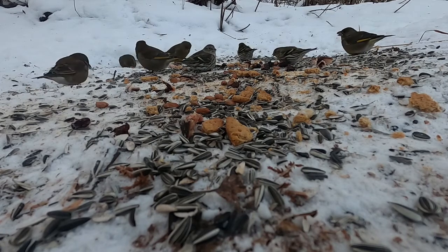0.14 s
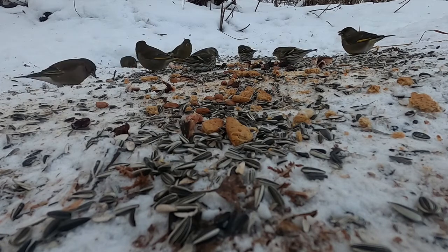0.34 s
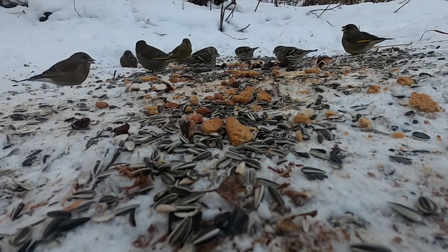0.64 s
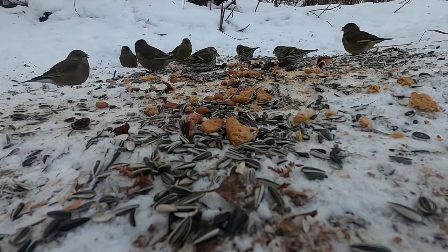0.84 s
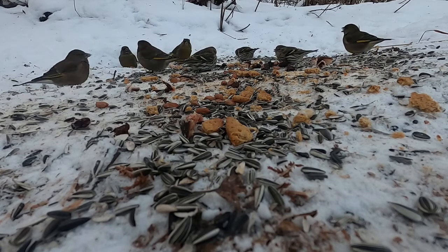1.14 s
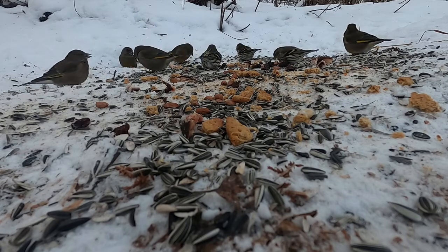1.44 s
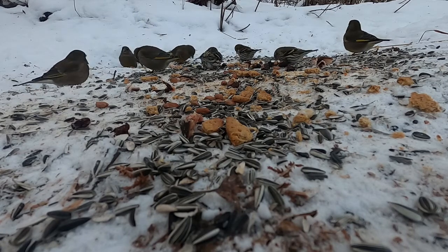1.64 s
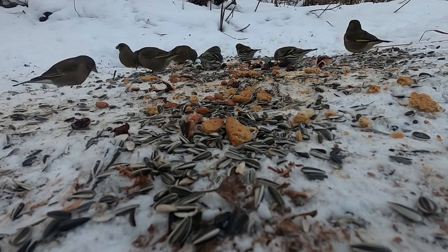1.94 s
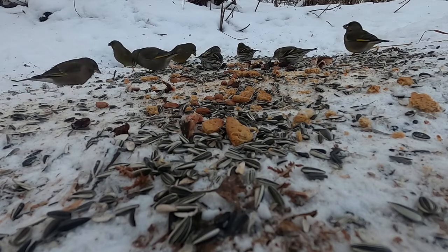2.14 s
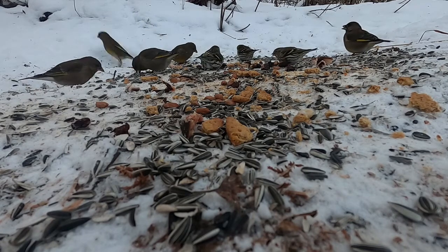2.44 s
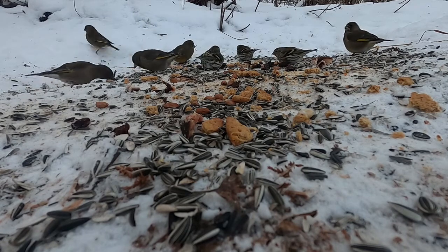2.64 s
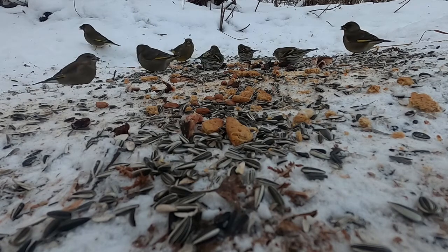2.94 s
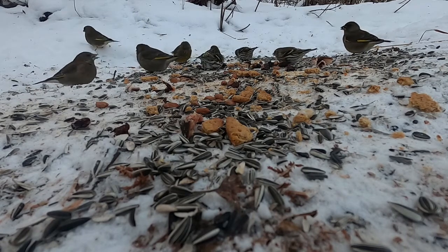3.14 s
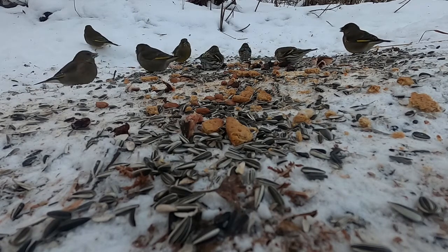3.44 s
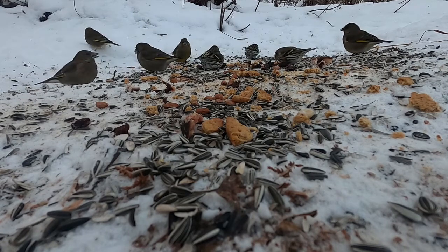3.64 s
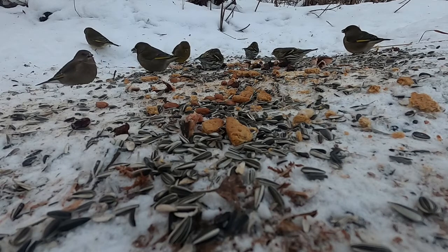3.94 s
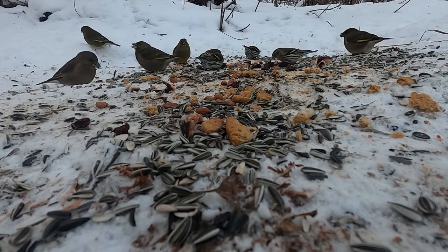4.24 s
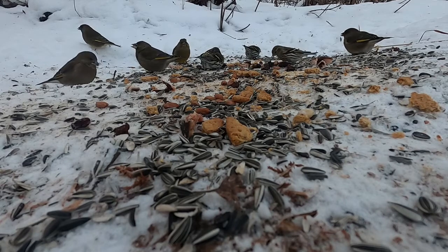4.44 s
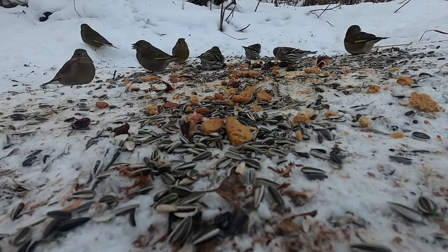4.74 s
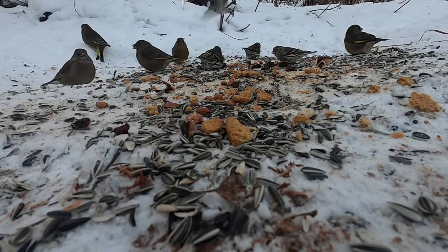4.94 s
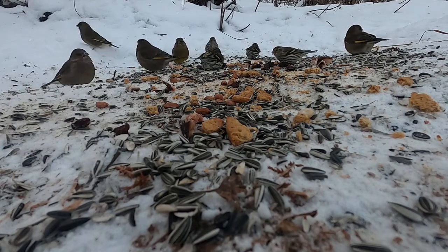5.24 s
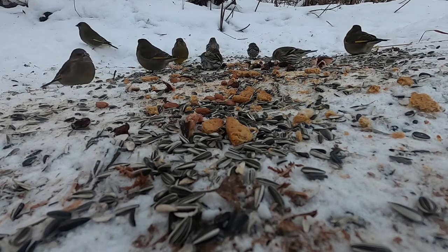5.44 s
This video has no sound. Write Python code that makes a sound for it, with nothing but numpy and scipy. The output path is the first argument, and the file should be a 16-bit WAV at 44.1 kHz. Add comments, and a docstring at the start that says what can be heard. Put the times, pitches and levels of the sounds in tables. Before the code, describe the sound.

Sharp dry seed-husk cracks tick irregularly close by over a low distant traffic rumble and wavering hum, with faint bird calls and a brief wing flutter.

```python
"""First a dry husk crack over low traffic rumble: small finches feed on snowy ground, a metre from two microphone ports.
Each crack is a knot of short pings with a bounce off the snow. Buzzy calls are trilled harmonics shaped by a throat;
thin whistles are gliding tones. One bird flutters up in low puffs of air and feather swish. Shaped noise makes the
far traffic, the far twitter and the rustle of husks and snow; wavering tones make a machine hum."""
import sys
import numpy as np
from scipy import signal
from scipy.fft import rfft, irfft, next_fast_len
from scipy.io import wavfile
from scipy.ndimage import map_coordinates

SR = 44100
rng = np.random.default_rng(int(sys.argv[2]) if len(sys.argv) > 2 else 0)


def store_pcm(level_fs):
    """Save levels as 16-bit WAV."""
    pcm = np.round(np.clip(level_fs, -1, 1) * 32767).astype(np.int16)
    wavfile.write(sys.argv[1], SR, np.atleast_2d(pcm).T)


N = 246959
SIDES = np.array([[1], [-1]])  # left port, right port; a positive left-right level leans left


def amp(db):
    """Decibels to gain."""
    return 10 ** (np.asarray(db) / 20)


def unit(x):
    """x at rms 1."""
    return x / np.sqrt(np.mean(x ** 2) + 1e-20)


def along(points, hz):
    """Each column after the frequency, read on a log frequency axis."""
    f, *cols = np.transpose(points)
    return [np.interp(np.log(hz + 1), np.log(f + 1), c) for c in cols]


def curves(rows):
    """One value per sample for each column after the time."""
    s, *cols = np.transpose(rows)
    return [np.interp(np.arange(N) / SR, s, c) for c in cols]


def wobble(rate):
    """A smooth random curve with `rate` knots a second."""
    knots = rng.standard_normal(int(N * rate / SR) + 4)
    return map_coordinates(knots, [np.arange(N) * rate / SR])


def add(track, s, sound, pan_db):
    """Lay a sound (one row, or one per port) into the stereo track at time s."""
    k = round(s * SR)
    track[:, k:k + np.shape(sound)[-1]] += sound * amp(SIDES * pan_db / 2)


def rush(spectrum, ports):
    """Stereo noise of mid rms 1; the right port hears a lagging copy plus noise of its own."""
    m = next_fast_len(N)
    hz = np.fft.rfftfreq(m, 1 / SR)
    shared, own = rfft(rng.standard_normal((2, m))) * amp(along(spectrum, hz)[0])
    alike, lead, pan_db = along(ports, hz)
    alike = np.clip(alike, 0, 1)
    right = alike * shared * np.exp(-1j * lead) + np.sqrt(1 - alike ** 2) * own
    pair = irfft([shared * amp(pan_db / 2), right * amp(-pan_db / 2)], m)[:, :N]
    return pair / np.std(pair.mean(axis=0))


# far traffic, low rumble: (frequency [Hz], relative level [dB per Hz])
RUMBLE_SPECTRUM = [(12, -35.5), (20, -0.5), (54, 2.5), (172, -7.5), (206, -5), (231, -5.5), (263, -4),
                   (354, -15), (409, -16.5), (600, -32.5), (780, -73.5), (1320, -120)]
# far traffic, tyre hiss: (frequency [Hz], relative level [dB per Hz])
TYRE_SPECTRUM = [(240, -41), (400, -3.5), (560, -9.5), (687, -10), (835, -12.5), (1370, -9), (2090, -28),
                 (2600, -35.5), (3380, -71), (5720, -120)]
# mean loudness of the tyres: (time [s], level [dB])
TYRE_LEVEL = [(0, -62.5), (1.4, -61.5), (2.6, -63), (2.9, -61.5), (3.15, -65), (3.5, -65), (4.2, -60.5),
              (4.7, -60.5), (5.0, -57.5), (5.6, -59.5)]
# far sound at the two ports: (frequency [Hz], likeness [0 to 1], left lead [rad], left-right level [dB])
FAR_PORTS = [(29.5, 0.82, 0.33, -4), (56.6, 0.91, 0.15, 0), (154, 1, 0.32, -0.5), (259, 0.99, 0.38, 1.5),
             (600, 0.75, 0.58, 2.5), (1300, 0.64, 2.12, 1.5), (2460, 0.29, 2.15, 6.5)]
RUMBLE_DB = -40.5  # mean level


def traffic():
    """Far traffic: low rumble and tyre hiss, both noise that drifts in level."""
    rumble = amp(RUMBLE_DB + 1.6 * wobble(3.8)) * rush(RUMBLE_SPECTRUM, FAR_PORTS)
    hiss = amp(curves(TYRE_LEVEL)[0] + 0.8 * wobble(6)) * rush(TYRE_SPECTRUM, FAR_PORTS)
    return rumble + hiss


# mean level of each hum tone: (time [s], then one level [dB] for each tone in HUM_TONES)
HUM_LEVELS = [(0, -55.5, -48.5, -68.5, -88), (1.4, -56, -44.5, -59, -96.5), (2.6, -48, -49, -59, -80),
              (3.8, -50.5, -50, -53, -77), (4.6, -54.5, -56.5, -59, -71.5), (5.6, -54, -52, -52.5, -71)]
# mean pitch of the hum tones: [Hz] each
HUM_TONES = [208.7, 265.6, 308.2, 686]


def machine_hum():
    """Machine tones that waver in pitch and level, a little stronger at the left port."""
    hum = 0
    for hz, db in zip(HUM_TONES, curves(HUM_LEVELS)):
        phase = 2 * np.pi * np.cumsum(hz + 2.1 * wobble(8)) / SR
        hum = hum + amp(db + 2.5 * wobble(4.5)) * np.sin(phase)
    return np.sqrt(2) * hum * amp(0.7 * SIDES)


# the far flock's voices run together: (frequency [Hz], relative level [dB per Hz])
TWITTER_SPECTRUM = [(1800, -9.5), (2500, -5), (3300, -3), (4500, -5), (5500, -12.5), (7000, -41)]
# mean loudness of the far twitter: (time [s], level [dB])
TWITTER_LEVEL = [(0, -82.5), (.4, -79), (.7, -79.5), (.86, -76), (1.15, -88.5), (1.43, -83.5), (2.3, -86),
                 (3.3, -79.5), (3.8, -74), (3.95, -80.5), (4.62, -76), (4.75, -82.5), (4.95, -79),
                 (5.25, -83.5), (5.6, -82)]
# flock sound at the two ports: (frequency [Hz], likeness [0 to 1], left lead [rad], left-right level [dB])
FLOCK_PORTS = [(2000, 0.25, 0.0066, 7), (3950, 0.2, 0.0053, 3.5), (7000, 0.86, 0.012, 1),
               (15000, 0.62, 0.0059, -7)]


def far_twitter():
    """Voices of the far flock, blurred into noise that swells and sinks."""
    return amp(curves(TWITTER_LEVEL)[0] + 2.2 * wobble(30)) * rush(TWITTER_SPECTRUM, FLOCK_PORTS)


# mean loudness of the husk rustle: (time [s], level [dB])
RUSTLE_LEVEL = [(0, -90), (.31, -80), (.6, -88.5), (.86, -76.5), (1.1, -85.5), (1.4, -79.5), (1.48, -70),
                (1.53, -82), (1.57, -74), (1.6, -80.5), (1.63, -83.5), (1.7, -82), (2.0, -85), (2.55, -85),
                (2.73, -74), (2.9, -80.5), (3.3, -81), (3.9, -82.5), (4.5, -84.5), (4.62, -77.5),
                (4.75, -81), (4.93, -74.5), (5.05, -78), (5.22, -80.5), (5.6, -85.5)]
# snow crunch relative to the husk rustle: (time [s], level difference [dB])
CRUNCH_OVER_RUSTLE = [(0, -17.5), (.9, -23), (1.4, -11.5), (2.3, -5.5), (2.6, -6), (3, -12.5), (4.3, -9),
                      (4.7, -11.5), (5.6, -10.5)]


def bustle():
    """Levels of husk rustle and of snow crunch, which follows it."""
    husk_db = curves(RUSTLE_LEVEL)[0]
    return husk_db, husk_db + curves(CRUNCH_OVER_RUSTLE)[0]


# stirred husks: (frequency [Hz], relative level [dB per Hz])
HUSK_SPECTRUM = [(3500, -12), (5000, -1), (6000, -2), (7600, 1.5), (8800, -7.5), (10000, -21), (12000, -61)]
# crunching snow: (frequency [Hz], relative level [dB per Hz])
CRUNCH_SPECTRUM = [(7000, -46), (9300, 1.5), (10600, -4.5), (12200, -2), (13500, -6), (15800, -9),
                   (16500, -46.5)]
GRAIN_DB = 3.3  # how sharply the rustle breaks up into grains


def rustle():
    """Feet and beaks stir husks and snow together: noise broken into fast grains of level."""
    husk_db, crunch_db = bustle()
    steps = wobble(24.97)
    husk_db = husk_db + 2.8 * steps + GRAIN_DB * unit(wobble(400))
    crunch_db = crunch_db + 3.2 * steps + 2.5 * wobble(19) + GRAIN_DB * unit(wobble(400))
    return amp(husk_db) * rush(HUSK_SPECTRUM, FLOCK_PORTS) + amp(crunch_db) * rush(CRUNCH_SPECTRUM, FLOCK_PORTS)


# effort as a bird flutters up: (time [s], level [dB])
FLUTTER_EFFORT = [(4.85, -8), (4.9, 1.5), (5.0, -2), (5.075, -7), (5.11, -9), (5.21, 3), (5.25, -17)]
# feather swish: (frequency [Hz], relative level [dB per Hz])
FEATHER_SPECTRUM = [(400, -15), (900, 5), (1500, 0), (2500, -9.5), (5000, -23), (8000, -31)]
DOWNSTROKE_S, BEATS_PER_S = 4.903, 29.2  # time of one downstroke, and the beat rate
PUSH_HZ, PUSH_DB, SWISH_DB = 56.3, -28.5, -59.5  # pushed air, feather swish; levels before effort


def wings():
    """Each downstroke pushes one low puff of air and swishes the feathers."""
    t = np.arange(N) / SR
    beat = (BEATS_PER_S * (t - DOWNSTROKE_S) + .5) % 1 - .5  # turns from the nearest downstroke
    aloft = (t > FLUTTER_EFFORT[0][0]) * (t < FLUTTER_EFFORT[-1][0])
    effort = amp(curves(FLUTTER_EFFORT)[0]) * aloft
    stroke = np.exp(3.9 * (np.cos(2 * np.pi * beat) - 1))
    push = stroke * np.sin(2 * np.pi * PUSH_HZ * beat / BEATS_PER_S + wobble(29))
    swish = (0.53 + 0.36 * stroke) * amp(2.8 * wobble(40)) * rush(FEATHER_SPECTRUM, FLOCK_PORTS)
    return effort * (amp(PUSH_DB) * push + amp(SWISH_DB) * swish)


def bend(start_hz, middle_hz, end_hz, u):
    """A pitch that passes through three values as u runs from 0 to 1."""
    line = start_hz + (end_hz - start_hz) * u
    return line + (2 * middle_hz - start_hz - end_hz) * 2 * u * (1 - u)


ECHO_DB, FARTHER = -18, .42  # echo of a -49 dB call; dB of echo gained per dB that a call is fainter


def place(track, s, call, db, pan_db):
    """A call and its scattered echoes; the fainter bird is farther, so its echoes weigh more."""
    t = np.arange(SR // 5) / SR
    tail = rng.standard_normal((2, len(t))) * amp(-60 * t / 0.17)
    echoes = signal.fftconvolve(call[None], tail / np.linalg.norm(tail[0]), axes=1)
    add(track, s, call, pan_db)
    add(track, s + 0.0028, amp(-6.5) * call, pan_db)  # the bounce off the snow
    add(track, s, amp(ECHO_DB + FARTHER * (-49 - db)) * echoes, pan_db / 2)


# whistled notes, each one bend of pitch:
# (time [s], length [s], start [Hz], middle [Hz], end [Hz], level before flutter and panning [dB])
WHISTLE_NOTES = [(0.048, 0.027, 2830, 3060, 2690, -76), (0.138, 0.022, 2850, 2780, 2950, -86),
                 (0.162, 0.035, 3790, 3400, 2730, -78), (0.348, 0.015, 4400, 4400, 4350, -81),
                 (.748, 0.01, 3850, 4070, 4230, -80), (0.797, 0.031, 3380, 3750, 4440, -81),
                 (0.847, .036, 4600, 5000, 3950, -79), (1.028, 0.046, 3960, 3850, 3750, -88),
                 (0.997, 0.031, 7950, 7800, 7500, -89), (1.19, 0.055, 4100, 4180, 4050, -80),
                 (1.334, 0.035, 7600, 7400, 6900, -84), (1.393, 0.011, 7200, 7100, 7400, -77),
                 (1.734, .013, 3870, 4500, 5000, -79), (1.742, .021, 5000, 4550, 3850, -71),
                 (1.762, .014, 4800, 4440, 3900, -77), (1.905, 0.014, 4200, 4630, 3600, -78),
                 (1.923, 0.028, 3550, 4650, 5200, -74), (2.469, 0.016, 3820, 3800, 3500, -82),
                 (2.925, 0.029, 3380, 2620, 2200, -64.5), (2.929, 0.0265, 3420, 3030, 2830, -66),
                 (3.8195, 0.019, 2410, 2850, 3020, -50), (4.276, 0.084, 4200, 4260, 4400, -82.5),
                 (4.375, 0.032, 4330, 3930, 3850, -88), (4.411, 0.0057, 3500, 3700, 3600, -66),
                 (4.436, 0.021, 4030, 3900, 3450, -72), (4.453, 0.032, 5540, 5500, 5370, -81),
                 (4.581, 0.033, 4000, 3780, 3650, -79), (5.518, 0.018, 4180, 5300, 6200, -76.5)]
SWELL_S, FADE_S = 0.0034, 0.0018  # how a note starts and ends
WAVER = .013  # size of the pitch wander, as a share
FLUTTER_PER_DB = .05  # fainter, farther whistles flutter more in level


def whistles():
    """Thin gliding tones, unsteady in pitch and level; overtones grow with loudness."""
    track = np.zeros((2, N + SR))
    flutter, waver = wobble(200), wobble(250)
    for s, length, start_hz, middle_hz, end_hz, db in WHISTLE_NOTES:
        t = np.arange(round(length * SR)) / SR
        now = ((s + t) * SR).astype(int)
        hz = bend(start_hz, middle_hz, end_hz, t / length) * (1 + WAVER * waver[now])
        phase = 2 * np.pi * np.cumsum(hz) / SR
        edges = np.clip(np.minimum(t / SWELL_S, (length - t) / FADE_S), 0, 1)
        overtones = amp(-15.5 + .8 * (db + 49.5)) * (np.sin(2 * phase) + amp(-17.5) * np.sin(3 * phase))
        level = np.sqrt(2) * amp(db + FLUTTER_PER_DB * (-43 - db) * flutter[now])
        place(track, s, level * edges * (np.sin(phase) + overtones), db, 7.2)
    return track[:, :N]


# buzzy contact calls: (time [s], length [s], swell [s], start [Hz], middle [Hz], end [Hz],
#   level before throat and trill [dB], trill rate [per s], first top of the trill after the start [s],
#   trill depth at start [share], at end [share], brightness: gain of harmonic 3, doubled for 4 and 5 [dB])
BUZZ_CALLS = [(0.214, 0.028, .003, 2100, 1640, 1620, -81, 150, 0.0012, 0.06, 0.13, 5.5),
              (0.244, 0.041, 0.008, 1620, 1757, 1630, -75.5, 200, 0.0018, 0.059, 0.11, 7.5),
              (0.284, 0.042, .004, 1760, 1700, 1550, -82, 140, 0.0034, .06, .06, 0),
              (0.764, 0.04, .003, 1680, 1670, 1600, -77.5, 150, 0.0023, 0.04, 0.09, 8),
              (0.82, 0.046, .004, 1406, 1590, 1560, -74, 150, 0.0077, 0.03, .08, 2),
              (0.879, 0.1, .004, 2000, 2040, 1930, -75.5, 170, 0.0035, .02, .025, -12),
              (0.974, 0.056, .004, 1884, 1960, 1850, -77.5, 150, .003, .015, .02, -15),
              (1.253, 0.15, .006, 2160, 2084, 1800, -78, 130, 0.0041, 0.13, .09, -15),
              (1.661, 0.041, 0.0089, 2150, 2380, 2060, -73, 110, 0.0098, 0.1, .07, -17),
              (1.703, 0.105, .006, 2010, 1843, 2000, -79.5, 133, 0.0042, .03, 0.02, -15),
              (3.268, 0.023, 0.0017, 1855, 1886, 1910, -59, 120, 0.0076, 0.12, 0.12, 1.5),
              (3.43, 0.02, 0.0074, 1590, 1875, 2180, -65.5, 152, 0.0045, 0.075, .08, -2),
              (3.578, 0.013, 0.0022, 1910, 1845, 1800, -55, 112, 0.0099, 0.15, 0.19, -0.5),
              (3.717, 0.067, 0.0028, 1903, 1624, 1600, -60.5, 150, 0.0038, 0.086, 0.22, -5.5),
              (3.765, 0.059, 0.0048, 1464, 1637, 1660, -58, 170, 0.0063, 0.19, .01, -5),
              (4.4187, 0.021, 0.0025, 1900, 1920, 1985, -57, 118, 0.0018, 0.22, 0.2, 0),
              (4.546, 0.027, 0.017, 1586, 1957, 2310, -57, 156, 0.0049, 0.15, 0.21, -0.5)]
# resonance of the throat: (frequency [Hz], level [dB])
THROAT_RESONANCE = [(1600, -13.5), (3000, -3), (4200, 1.5), (5600, -6.5), (8500, -25.5)]
# the buzzing birds sit left; it shows less in the treble: (frequency [Hz], left-right level [dB])
BUZZ_SIDE = [(2500, 10.5), (3600, 11.5), (5500, 5)]
HARSH_DEPTH, RASP_DB, SHAKE = .08, 3, .014  # at this trill depth: unevenness of level, and of pitch as a share
PULSE_DB, PULSE_RAD = 1.8, 2.3  # the falling stroke of each trill is louder; where in the turn
PATCHY_PER_DB, STUMBLE_RAD = .075, .25  # fainter, farther buzzes come in patches; unevenness of the beat


def throat(phase, hz, bright_db):
    """Five harmonics, each favoured as it sweeps through the throat's resonance."""
    voice = 0
    for k in range(1, 6):
        tilt_db = bright_db * np.clip(k - 2, 0, 2) if k > 1 else min(bright_db + 4, 0)
        voice = voice + amp(along(THROAT_RESONANCE, k * hz)[0] + tilt_db) * np.sin(k * phase)
    return voice


def buzzes():
    """Calls whose pitch trills fast and a little unevenly, heard through the throat."""
    track = np.zeros((2, N + SR))
    shake, rasp, patches, stumble = wobble(500), wobble(1500), wobble(120), wobble(70)
    for (s, length, swell, start_hz, middle_hz, end_hz, db,
         rate, first, deep, deep_end, bright_db) in BUZZ_CALLS:
        t = np.arange(round(length * SR)) / SR
        now, u = ((s + t) * SR).astype(int), t / length
        turn = 2 * np.pi * rate * (t - first) + STUMBLE_RAD * stumble[now]
        depth = deep + (deep_end - deep) * u
        harsh = np.clip(depth / HARSH_DEPTH, .5, 1.25)  # deeper trills are rougher
        trill = 1 + depth * np.cos(turn) + harsh * SHAKE * shake[now]
        hz = bend(start_hz, middle_hz, end_hz, u) * trill
        voice = throat(2 * np.pi * np.cumsum(hz) / SR, hz, bright_db)
        edges = np.clip(np.minimum((t / swell) ** 2, (length - t) / (0.22 * length)), 0, 1)
        uneven_db = harsh * RASP_DB * rasp[now] + PULSE_DB * np.cos(turn - PULSE_RAD)
        uneven_db += PATCHY_PER_DB * (-45.5 - db) * patches[now]
        place(track, s, np.sqrt(2) * amp(db + uneven_db) * edges * voice, db, 0)
    side_db = along(BUZZ_SIDE, np.fft.rfftfreq(N + SR, 1 / SR))[0]
    return irfft(rfft(track) * amp(SIDES * side_db / 2), N + SR)[:, :N]


def ping(hz, decay, phase):
    """A few cycles that swell and die, envelope peak 1; decay in seconds."""
    u = np.arange(256) / SR / decay
    return (u / 2) ** 2 * np.exp(2 - u) * np.sin(2 * np.pi * hz * u * decay + phase)


KNOCK_HZ, KNOCK_DB = 1440, -8  # its level follows the thud
STRAIN_S = .012  # the husk creaks this long before it gives
BITS_PER_S, BITS_HZ, BITS_DB = 320, 7460, -11  # tiny ticks before and after a crack; level at the split
SNAP_LEAD_RAD = -0.22  # half the phase by which the left port leads on a snap from straight ahead
LEAD_PER_DB = .2  # rad more of it for each dB that a crack lies to the right


def crack(body_db, snap_db, top_db, snap_hz, pan_db, chance):
    """A husk strains and splits: knock, thud, snap, port ring, a bounce off the snow, tiny ticks around it."""
    # the two ports meet the wave at different moments
    skew = SIDES * (LEAD_PER_DB * min(pan_db, 0) + 0.65 * (chance[4] - .5))
    lead = SNAP_LEAD_RAD * SIDES
    # the beak jolts the seed on the crust, the seed thuds, the husk snaps
    knock = amp(body_db + KNOCK_DB) * ping(KNOCK_HZ, 0.00011, 6 * chance[1])
    body_hz = 1262.4 + 2025.1 * chance[0]
    body = amp(body_db + 2.5) * ping(body_hz, .00009, 6 * chance[1] + 0.58 * skew + lead)
    snap = amp(snap_db + 4.0) * ping(snap_hz, .00007, 6 * chance[2] + skew + lead)
    # resonance of the microphone ports, given more to the right one
    ring_hz = 11598.9 + 528.9 * chance[3]
    ring_phase = 6 * chance[2] + 1.5 * skew + SIDES * (chance[0] - .5)
    top = amp(top_db) * amp([[-3], [5]]) * ping(ring_hz, .00007, ring_phase)

    direct = np.pad(knock + body + snap + top, ((0, 0), (round(STRAIN_S * SR), 1300)))
    bounce = amp(-23.5 + 12.0 * chance[3]) * np.roll(direct, int(8 + 14 * chance[0]), axis=1)
    t = np.arange(direct.shape[1]) / SR - STRAIN_S  # seconds from the split
    draw = rng.random((2, len(t)))
    tick_gain = amp(BITS_DB - 60 * np.maximum(t / 0.067, -t / 0.055))
    ticks = (draw[0] < BITS_PER_S / SR) * (2 * draw[1] - 1) * tick_gain
    bit = amp(snap_db) * ping(BITS_HZ, .0001, skew) + amp(3.0) * top
    bits = signal.fftconvolve(bit, ticks[None], axes=1)
    tail = (t > 0) * rng.standard_normal(direct.shape) * amp(-35 - 60 * t / 0.066)
    scatter = signal.fftconvolve(snap, tail, axes=1)
    return direct + bounce + (bits + scatter)[:, :len(t)]


# the clearest husk cracks, and at 4.5685 s a click as the buzzing call there ends; levels before each ping's
# own gain: # (time [s], thud level [dB], snap level [dB], port ring level [dB], snap pitch [Hz], left-right
# level [dB])
CLEAR_CRACKS = [(0.033, -45, -55.5, -62, 8000, -3), (0.0365, -54, -49, -85, 4460, -1.5),
                (.0445, -62, -68, -87, 7500, -4), (.1162, -64, -58, -85, 4500, -1),
                (.3094, -60, -65, -85, 7500, 1), (0.631, -57, -68, -85, 4500, 13),
                (0.634, -59, -57.5, -71, 6000, 13), (.8494, -72, -63, -88, 8000, -2),
                (0.9656, -64, -41.5, -58, 6860, -3.5), (0.9794, -57, -56, -69, 7100, 7),
                (1.041, -67, -66, -63, 7500, -1), (1.22, -73, -53, -75, 7100, -0.5),
                (1.2494, -68, -68, -88, 5500, 2), (1.2572, -66, -62, -78, 6500, 1),
                (1.2874, -57, -68, -85, 4500, 7), (1.266, -57, -46, -68, 6740, -3.5),
                (1.3956, -58, -62, -69, 6900, -5), (1.447, -44, -39.5, -42.5, 7300, 0.5),
                (1.4586, -52, -60, -68, 7300, 2), (1.5034, -58, -54, -75, 6800, 1),
                (1.5772, -73, -56, -67, 6640, 1), (1.5825, -68, -62, -63, 7100, -2),
                (1.6295, -65, -57, -85, 5300, -2), (1.6818, -68, -67, -75, 7000, 1),
                (1.7262, -53, -54, -69, 6800, -4.5), (1.772, -73, -50.5, -62, 4760, -2.5),
                (1.922, -68, -54, -67, 4500, -5), (1.8435, -75, -59, -76, 6000, 0),
                (1.874, -66, -62, -76, 6500, -1), (2.001, -77, -60, -67, 7060, -2),
                (2.0247, -49, -41, -37, 8000, 1), (2.3032, -75, -62, -74, 7200, 2),
                (2.3898, -70, -62, -77, 7600, 4), (2.234, -58, -56, -71, 7800, -1),
                (2.5548, -72, -50.5, -47, 7440, 0), (2.581, -57, -48.5, -65, 6800, -2.5),
                (2.597, -42, -44, -44, 4860, -1), (2.6222, -70, -44.5, -57, 6100, -5),
                (2.6955, -44, -29.5, -45, 5830, -3.5), (2.727, -69, -56, -64, 7100, -3),
                (2.733, -44.5, -39.5, -51, 6140, -3.5), (2.9758, -64, -51.5, -66, 7460, -1),
                (2.9843, -67, -55, -89, 5400, -1.5), (3.038, -60, -56.5, -65, 7400, 1),
                (3.134, -60, -54, -68, 6260, 0), (3.1865, -49.5, -50, -59, 8300, -1),
                (3.2355, -58, -44, -51, 7300, -1.5), (3.3975, -66, -40, -46, 6350, 0.5),
                (3.445, -62, -54, -64, 4500, 4), (3.4492, -56, -47, -64, 4440, -1.5),
                (3.455, -57, -51.5, -58, 7800, 0), (3.504, -54, -48, -56, 8400, -3),
                (3.525, -51, -42.5, -55, 5240, -4), (3.571, -51, -52, -59, 7800, 0),
                (3.595, -60, -39.5, -50, 4900, 3), (3.7072, -48, -58, -63, 4500, -5),
                (3.7245, -62, -48, -57, 6440, 0), (3.726, -63, -43.5, -51, 5900, -0.5),
                (3.7634, -48, -44, -68, 6200, -4), (3.8044, -48, -45.5, -51, 7400, -2),
                (3.8768, -43, -46, -53, 5300, 0), (3.9062, -52, -54, -64, 4960, 2),
                (4.149, -69, -41, -52, 5760, 1), (4.2064, -61, -41.5, -46, 4530, -3.5),
                (4.2328, -61, -55, -87, 6200, 1), (4.2484, -41, -40.5, -46, 5740, 1),
                (4.2536, -55, -43, -42, 5400, -2), (4.258, -67, -52, -70, 7500, 14),
                (4.3218, -70, -58, -67, 5800, -2), (4.3536, -58, -53, -76, 4540, 3),
                (4.5685, -49, -41, -73, 4730, 0), (4.6789, -46.5, -31, -37.5, 6800, 1),
                (4.778, -47, -41.5, -40, 7100, 1), (4.875, -53, -51.5, -57, 5900, 2),
                (4.909, -51, -52, -62, 7100, -1), (4.938, -52, -60, -61, 8500, -4.5),
                (5.0243, -37.5, -34.5, -37, 7400, 1.5), (5.0465, -68, -48, -54, 6900, 0),
                (5.1088, -39.5, -32.5, -50, 5400, 1.5), (5.1163, -48, -57, -41.5, 9150, 3),
                (5.196, -53, -51, -50, 7500, 2), (5.319, -58, -56, -56, 8700, -3.5),
                (5.567, -54, -49.5, -51, 7900, 1)]
FAINT_DB, FAINT_SPREAD_DB = 8, 6.5  # faint cracks over the rustle: base level, and scale of their scatter


def cracks():
    """The clear cracks a metre away, then many faint ones that follow the bustle of the flock."""
    track = np.zeros((2, N + SR))
    chances = rng.random((len(CLEAR_CRACKS), 5))
    for (s, body_db, snap_db, top_db, hz, pan_db), chance in zip(CLEAR_CRACKS, chances):
        split = crack(body_db, snap_db, top_db, hz, pan_db, chance)
        add(track, s - STRAIN_S - .00018, split, pan_db)
    husk_db, crunch_db = bustle()
    for s, size, pitch, side, *chance in rng.random((600, 9)):
        k = int(s * N)
        over_db = FAINT_DB - FAINT_SPREAD_DB * np.log(size + 0.056)  # many small, few large
        db = (husk_db[k] + crunch_db[k]) / 2 + over_db
        top_db = crunch_db[k] + over_db - 14 + 11 * pitch
        pan_db = 8 * side - 4
        add(track, k / SR, crack(db - 0.5, db, top_db, 5500 + 3000 * pitch, pan_db, chance), pan_db)
    return track[:, :N]


def scene():
    """Everything that reaches the two microphone ports, from the far traffic to the near husks."""
    background = traffic() + machine_hum() + far_twitter() + rustle()
    return background + wings() + whistles() + buzzes() + cracks()


def record(dry):
    """The microphone fades steeply near 16480 Hz; nothing passes from 16500 Hz up."""
    m = next_fast_len(N + SR // 2)
    hz = np.fft.rfftfreq(m, 1 / SR)
    return irfft(rfft(dry, m) / (1 + (hz / 16480) ** 60) * (hz < 16500), m)[:, :N]


dry = scene()
out = record(dry)
store_pcm(out)
```